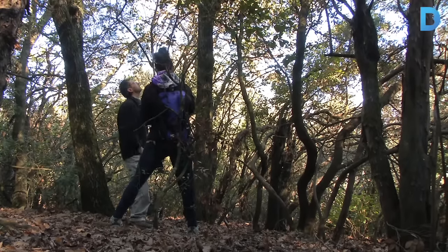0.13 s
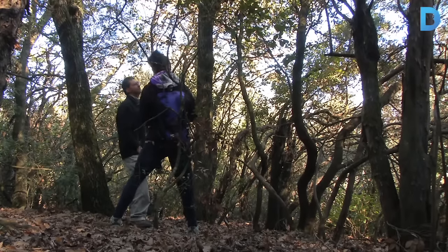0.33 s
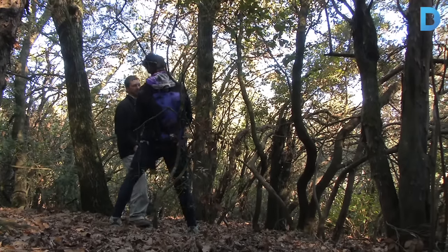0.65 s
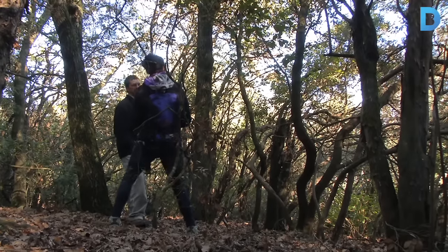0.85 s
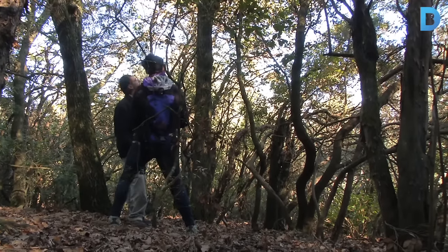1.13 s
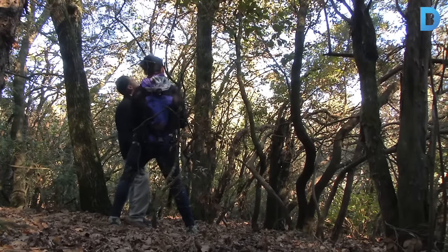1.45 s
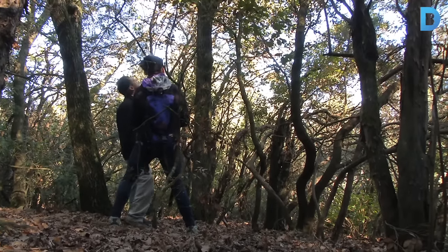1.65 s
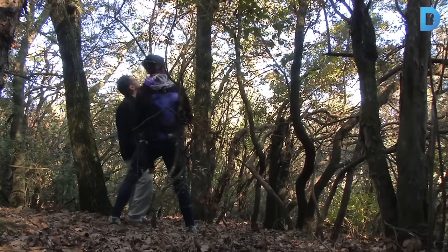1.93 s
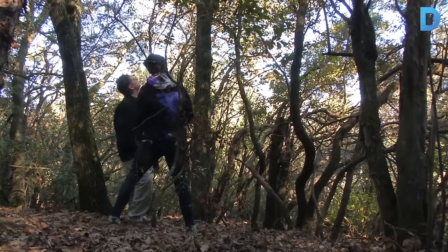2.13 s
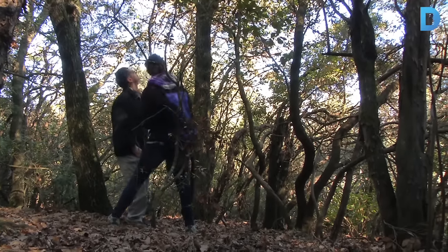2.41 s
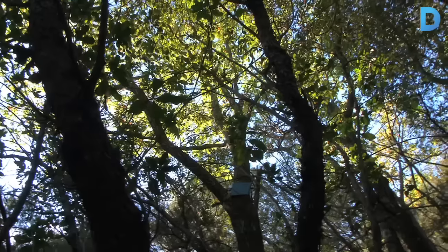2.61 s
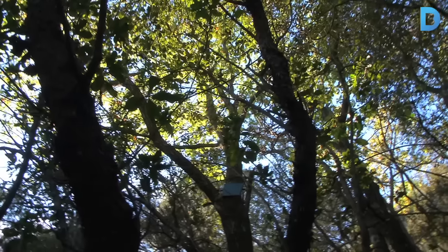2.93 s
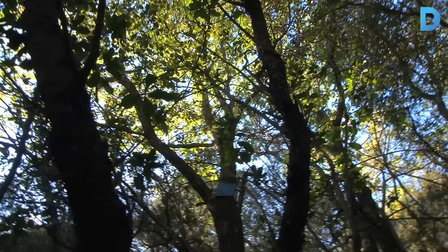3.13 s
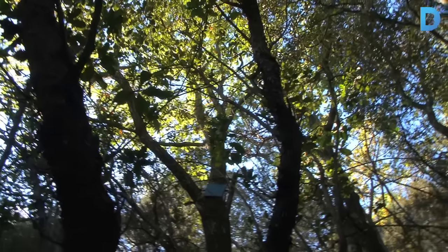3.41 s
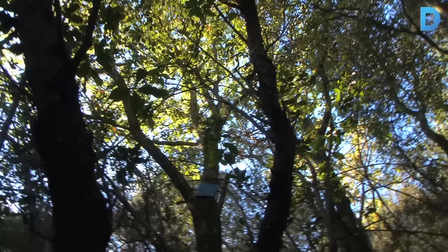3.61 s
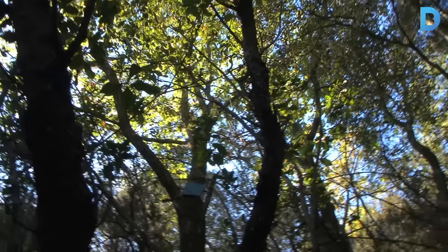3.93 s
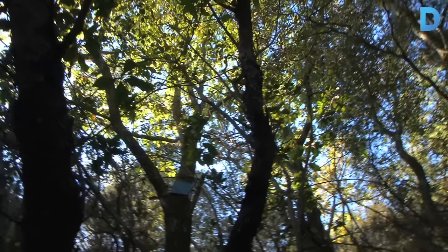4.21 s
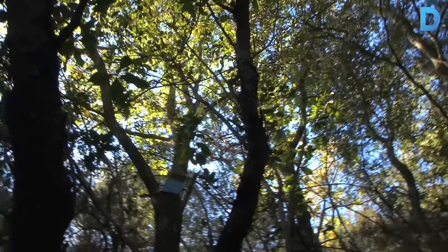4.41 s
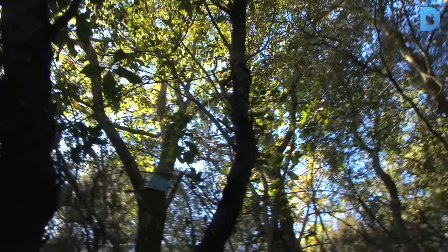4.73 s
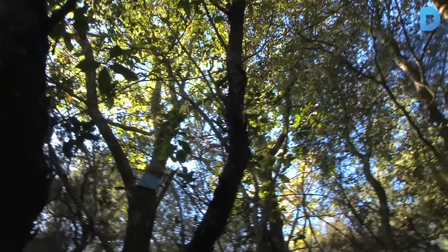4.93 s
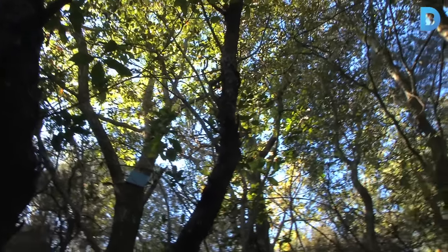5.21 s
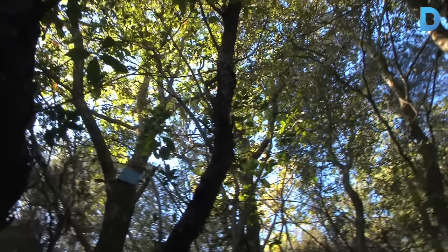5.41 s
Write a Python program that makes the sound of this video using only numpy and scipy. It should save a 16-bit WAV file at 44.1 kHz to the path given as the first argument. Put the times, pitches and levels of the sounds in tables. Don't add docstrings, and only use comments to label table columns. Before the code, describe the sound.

In a calm wood with faint low rumble and leafy hiss, a woodpecker drums a quickening, resonant roll on a dead limb. A high seesawing whistle song follows, then a nearer bird's low upward slur and drop, a rapid trill of falling syllables, and evenly repeated yelps to the end with scattered high whistles. Trunks and leaves give every call a grainy echo; the outdoor pickup is identical in both channels.

```python
import sys
import numpy as np
from scipy import signal
from scipy.fft import rfft, irfft
from scipy.io import wavfile
from scipy.ndimage import uniform_filter1d

SR = 44100
rng = np.random.default_rng(int(sys.argv[2]) if len(sys.argv) > 2 else 0)


def natural_amplitude(level_db):
    exponent = np.asarray(level_db, float) / 20
    return 10 ** exponent


def persist_wave(psi):
    counts = np.round(np.clip(psi, -1, 1) * 32767).astype(np.int16)
    wavfile.write(sys.argv[1], SR, np.atleast_2d(counts).T)


N = 245175


def unit(x):
    return x / np.sqrt(np.mean(x ** 2) + 1e-20)


def wobble(count, size):
    return unit(uniform_filter1d(rng.standard_normal(count), size=size))


def in_time(rows):
    s, *columns = np.transpose(rows)
    return [np.interp(np.arange(N) / SR, s, column) for column in columns]


def add(out, s, sound):
    at = round(s * SR)
    out[at:at + len(sound)] += sound[:N - at]


def voice(hz, partials_db):
    phase = 2 * np.pi * np.cumsum(hz) / SR
    return sum(natural_amplitude(db) * np.sin((k + 1) * phase) for k, db in enumerate(partials_db))


def forest(x, direct_db, echoes, clump_db, trunks=(), leaf_hz=20):
    t = np.arange(SR) / SR
    first_db, knee_s, knee_db, t60 = echoes
    decay_db = np.interp(t, [0, knee_s], [first_db, knee_db]) - 60 * np.maximum(t - knee_s, 0) / t60
    power = natural_amplitude(decay_db) ** 2
    for s, db in trunks:
        power = power + natural_amplitude(db) ** 2 * np.exp(-((t - s) / 0.0099) ** 2)
    clumps = natural_amplitude(clump_db * wobble(SR, size=150))
    path = rng.standard_normal(SR) * np.sqrt(power) * clumps / np.sqrt(SR / 1000)
    path = signal.sosfilt(signal.butter(2, leaf_hz, "high", fs=SR, output="sos"), path)
    path[0] += natural_amplitude(direct_db)
    return signal.fftconvolve(x, path)[:N]


def whistles(notes, waver_hz, flutter_db):
    out = np.zeros(N)
    waver = waver_hz * wobble(N, size=60)
    for s, length, first_hz, last_hz, level_db in notes:
        bend = 1.1
        if abs(np.log(last_hz / first_hz)) > .06:
            bend = .45 if last_hz > first_hz else .8
        u = np.linspace(0, 1, round(length * SR))
        hz = first_hz + (last_hz - first_hz) * u ** bend + waver[round(s * SR):][:len(u)]
        swell_db = 7 * (u - .7) * (last_hz > 1.1 * first_hz)
        add(out, s, voice(hz, [level_db + 4.0 + swell_db]) * signal.windows.tukey(len(u), .3))
    return out * natural_amplitude(flutter_db * wobble(N, size=130))


def coloured(spectrum):
    hz, level_db = np.transpose(spectrum)
    grid = np.log(np.fft.rfftfreq(N, 1 / SR) + 1)
    shape_db = np.interp(grid, np.log(hz), level_db, left=-90, right=-90)
    return unit(irfft(rfft(rng.standard_normal(N)) * natural_amplitude(shape_db), N))


# time in seconds, level in dB.
AIR_SWELL = [(0.0, -35.5), (0.54, -34), (0.7, -34.5), (0.84, -36), (1.18, -39), (1.45, -40), (1.87, -37.5),
             (2.38, -37.5), (5.56, -36.5)]
# frequency in Hz, level in dB per Hz.
RUMBLE_COLOUR = [(8.8, -45), (15, -12.5), (97, -4), (205, -4.5), (229, -7), (334, -10), (426, -12.5),
                 (679, -16.5), (776, -17.5), (3000, -28.5), (3900, -42), (6600, -120)]
# frequency in Hz, level in dB per Hz.
HISS_COLOUR = [(1180, -24), (2000, -9.5), (3530, -4), (3810, -7), (4450, -5), (6380, -5), (7320, -5),
               (9980, -4), (12700, 0.5), (15600, 5)]


def calm_air():
    rumble_db, = in_time(AIR_SWELL)
    hiss_db = -38 + 0.83 * (rumble_db - rumble_db.mean())
    return natural_amplitude(rumble_db + 2.5) * coloured(RUMBLE_COLOUR) + natural_amplitude(hiss_db + 3.0) * coloured(HISS_COLOUR)


def ring(modes, luck, t):
    return sum(natural_amplitude(db + own - 60 * t / t60) * np.sin(2 * np.pi * hz * t) for (hz, db, t60), own in zip(modes, luck))


# start in seconds, peak level in dB.
BLOWS = [(0.154, -12.5), (0.2089, -10), (0.264, -5), (0.3173, -8.5), (0.3682, -7), (0.4184, -6.5),
         (0.465, -7), (0.5094, -7.5), (0.5532, -10), (0.5967, -10), (0.6387, -10.5), (0.6795, -10),
         (0.7199, -11.5), (0.7593, -13), (0.7956, -19.5)]
# frequency in Hz, level in dB, time to fall 60 dB in seconds.
LIMB_BODY = [(441, -2.5, 0.064), (688, 1, 0.043), (860, 1.5, 0.034), (965, -12, 0.022), (1223, 0.5, 0.035),
             (1262, -3.5, 0.035), (1810, -4.5, 0.041), (2120, -1.5, 0.03)]
# frequency in Hz, level in dB, time to fall 60 dB in seconds.
LIMB_CRACK = [(2860, 3, .013), (2990, 0, .011), (3450, -2, .009), (3660, 0, .012), (3920, -2, .018),
              (5250, -4, .008), (6650, -9, .009), (7500, -16, .006)]
# first echo in dB, start of the even decay in seconds, level there in dB,
# time to fall 60 dB in seconds.
LIMB_ECHO = (-14, -0.0256, -19.5, 0.86)


def woodpecker():
    body, crack, t = np.zeros(N), np.zeros(N), np.arange(SR // 8) / SR
    luck = rng.normal(0, 1.5, (len(BLOWS), len(LIMB_BODY) + len(LIMB_CRACK)))
    woody = signal.butter(3, [900, 3950], "band", fs=SR, output="sos")
    splinters = signal.sosfilt(woody, rng.standard_normal((len(BLOWS), len(t)))) * natural_amplitude(8 - 60 * t / .025)
    contact = 1 - np.exp(-t / .0009)
    for (s, peak_db), row, splinter in zip(BLOWS, luck, splinters):
        body_db = -12 + 0.62 * peak_db - 4
        add(body, s, natural_amplitude(body_db) * (ring(LIMB_BODY, row, t) + splinter) * contact)
        add(crack, s, natural_amplitude(peak_db - 10) * ring(LIMB_CRACK, row[len(LIMB_BODY):], t) * contact)
    return forest(body, 0, LIMB_ECHO, clump_db=5) + forest(crack, 3.6, LIMB_ECHO, clump_db=1.5)


# upstroke start in seconds, its level in dB,
# downstroke start in seconds, its level in dB.
SWINGS = [(1.670, -30, 1.788, -33.5), (1.872, -30, 1.993, -33.5), (2.073, -29.5, 2.188, -32),
          (2.275, -28.5, 2.405, -33), (2.488, -29, 2.616, -32)]
# start in seconds, length in seconds, first Hz, last Hz, level in dB.
SONG_EXTRAS = [(1.340, 0.0296, 4300, 4890, -46), (1.405, 0.024, 7020, 7080, -41),
               (1.422, 0.038, 7040, 5340, -38.5), (1.460, 0.027, 3550, 3530, -51),
               (1.515, 0.077, 6160, 6670, -35.5), (1.583, 0.029, 5100, 3390, -36),
               (2.345, .025, 3450, 3290, -46), (2.390, 0.028, 3160, 3180, -46),
               (2.803, 0.0205, 3900, 4800, -31.5), (2.820, 0.034, 4800, 4910, -39.5)]
# start in seconds, length in
# seconds, first Hz, last Hz, level in dB.
FURTHER_NOTES = [
    (2.905, 0.053, 8600, 7960, -37),
    (2.946, 0.045, 8030, 7700, -33.5),
    (4.914, 0.055, 6840, 6430, -38.5),
    (5.014, 0.013, 5190, 5510, -30.5),
    (5.035, 0.022, 5550, 4030, -35),
    (5.122, 0.06, 5620, 6490, -37),
]
# first echo in dB, start of the even decay in seconds, level there in dB,
# time to fall 60 dB in seconds.
SEESAW_ECHO = (-16, .016, -8.5, .72)


def seesaw_song():
    upstroke, tick, downstroke = (.075, 5150, 6720), (.012, 5330, 5080), (.027, 5350, 3390)  # s, first Hz, last Hz
    notes = list(SONG_EXTRAS) + list(FURTHER_NOTES)
    for up_s, up_db, down_s, down_db in SWINGS:
        notes.append((up_s, *upstroke, up_db))
        notes.append((down_s - .003, *tick, down_db - 7))
        notes.append((down_s, *downstroke, down_db))
    song = whistles(notes, waver_hz=60, flutter_db=2)
    return natural_amplitude(-7) * forest(song, -6, SEESAW_ECHO, clump_db=2)


# first echo in dB, start of the even decay in seconds, level there in dB,
# time to fall 60 dB in seconds.
NEAR_ECHO = (-30, 0.05, -16.5, 0.75)
# delay after the direct sound in seconds, echo level in dB.
NEAR_TRUNKS = [(.012, -11), (.054, -20.5)]


def near_forest(x, direct_db):
    return forest(x, direct_db, NEAR_ECHO, clump_db=3, trunks=NEAR_TRUNKS, leaf_hz=1700)


def slurred(curve, second_db):
    t = np.arange(N) / SR
    hz, level_db = in_time(curve)
    sounding = (t > curve[0][0]) & (t < curve[-1][0])
    return voice(hz, [0, second_db]) * natural_amplitude(level_db - 4.5) * sounding


# time in seconds, pitch in Hz, level in dB.
CLIMB_CURVE = [(2.780, 924, -80), (2.790, 991, -35.5), (2.820, 1330, -35.5), (2.880, 1460, -38),
               (2.925, 1665, -28.5), (2.948, 1730, -29), (2.954, 1600, -58)]
# time in seconds, pitch in Hz, level in dB.
DROP_CURVE = [(2.952, 1395, -72), (2.960, 1295, -28.5), (3.000, 1275, -27.5), (3.018, 1340, -47),
              (3.035, 1096, -30), (3.050, 845, -42), (3.056, 830, -47)]


def low_phrase():
    return near_forest(slurred(CLIMB_CURVE, -30) + slurred(DROP_CURVE, -9.5), 5)


# start in seconds, length in seconds, first Hz, last Hz, level in dB.
OTHER_NOTES = [(3.125, 0.013, 3180, 3590, -35.5), (3.137, 0.049, 3590, 3600, -36),
               (4.165, 0.051, 7800, 7830, -38), (4.200, 0.06, 7500, 8130, -28),
               (4.400, 0.042, 5130, 5520, -36), (4.425, 0.017, 5495, 5370, -20.5),
               (4.462, 0.011, 5700, 5400, -32), (4.497, 0.053, 7580, 7660, -28.5),
               (4.590, 0.028, 7580, 7350, -29.5), (4.607, 0.058, 4290, 4240, -27.5),
               (4.66, 0.025, 4230, 4220, -27)]
# first echo in dB, start of the even decay in seconds, level there in dB,
# time to fall 60 dB in seconds.
OTHERS_ECHO = (-9, -0.07, -17, 0.9)


def other_whistlers():
    notes = whistles(OTHER_NOTES, waver_hz=40, flutter_db=2)
    return natural_amplitude(-6) * forest(notes, -2, OTHERS_ECHO, clump_db=3)


# start in seconds, length in seconds, first Hz, last
# Hz, level in dB.
TRILL_OPENING = [
    (3.228, 0.049, 6000, 5895, -32.5),
    (3.268, 0.014, 6300, 4110, -34),
    (3.282, 0.028, 6060, 5150, -35),
    (3.335, .02, 7400, 7300, -44),
    (3.358, 0.035, 6030, 6100, -37),
    (3.645, .012, 7450, 7360, -44),
]
# seconds from its start, length in seconds, first Hz, last Hz, level in dB.
TRILL_SYLLABLE = [
    (-.012, 0.0093, 7350, 7240, -42),
    (.004, 0.0084, 6870, 6370, -37),
    (.008, .02, 6700, 3956, -31),
    (0.025, 0.009, 4200, 3920, -42),
    (0.012, .026, 6000, 4884, -36.5),
    (.048, 0.017, 6770, 3900, -39),
]
# start in seconds, level in dB.
TRILL_REPEATS = [(3.350, -0.5), (3.456, -0.5), (3.559, 0), (3.658, -0.5), (3.760, -2), (3.861, -1),
                 (3.963, -0.5), (4.064, -4), (4.167, -15.5)]
# first echo in dB, start of the even decay in seconds, level there in dB,
# time to fall 60 dB in seconds.
TRILL_ECHO = (-16, .014, -9.5, .85)


def trill():
    notes = list(TRILL_OPENING)
    for s, db in TRILL_REPEATS:
        factor = 1.01 - .03 * (s - TRILL_REPEATS[0][0]) + .003 * db
        for at, length, first_hz, last_hz, own_db in TRILL_SYLLABLE:
            notes.append((s + at, length, factor * first_hz, factor * last_hz, db + own_db))
    song = whistles(notes, waver_hz=70, flutter_db=2.5)
    return natural_amplitude(-7) * forest(song, -7, TRILL_ECHO, clump_db=3)


# start in seconds, level in dB, pitch in Hz, length in seconds.
YELP_NOTES = [(3.747, -26.5, 940, 0.041), (3.936, -29, 1174, 0.034), (4.175, -27, 1175, 0.04),
              (4.403, -27, 1203, 0.043), (4.596, -28, 1239, 0.043), (4.768, -28, 1234, 0.049),
              (4.943, -27.5, 1273, .052), (5.125, -26, 1280, 0.045), (5.313, -27, 1270, 0.045),
              (5.496, -30, 1259, 0.054)]


def yelps():
    out = np.zeros(N)
    for s, level_db, hz, length in YELP_NOTES:
        u = np.linspace(0, 1, round(length * SR))
        fall = 0.425 * np.clip((hz - 905) / 250, 0, 1)
        pitch_hz = hz * (1 - .45 * np.exp(-u / .045) - .035 * u - fall * u ** 5.5)
        throat_db = 2.5 * np.exp(-((2 * pitch_hz - 2120) / 170) ** 2)
        third_db = -12.5 + 12.5 * np.exp(-((3 * hz - 3600) / 193) ** 2 / 2)
        closing_db = -26 * u ** 2
        partials_db = [-7.5 - 2 * u, throat_db * (1 + u) - 2 * u, third_db + closing_db,
                       -12 + closing_db, -16 + closing_db]
        swell = np.minimum(u / .2, 1) * np.minimum((1 - u) / .1, 1)
        add(out, s, natural_amplitude(level_db) * voice(pitch_hz, partials_db) * swell)
    return near_forest(out * natural_amplitude(2.0 * wobble(N, size=110)), 2.5)


def scene():
    birds = woodpecker() + seesaw_song() + low_phrase() + other_whistlers() + trill() + yelps()
    return np.tile(calm_air() + birds, (2, 1))


def low_pass(x):
    return signal.sosfilt(signal.butter(12, 16710, fs=SR, output="sos"), x)


def record(dry):
    cut = signal.cheby2(16, 80, 15860, fs=SR, output="sos")
    return low_pass(signal.sosfilt(cut, dry))


dry = scene()
out = record(dry)
persist_wave(out)
```